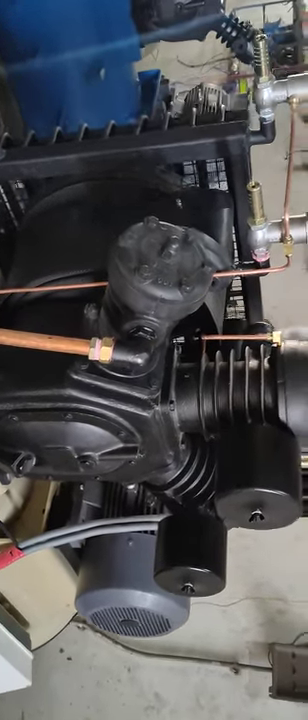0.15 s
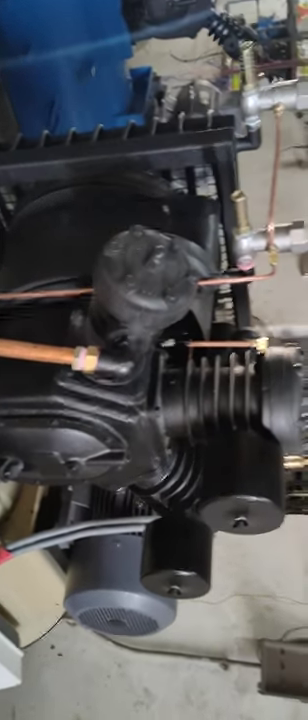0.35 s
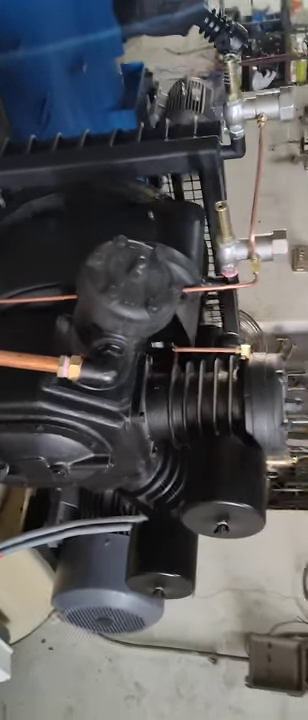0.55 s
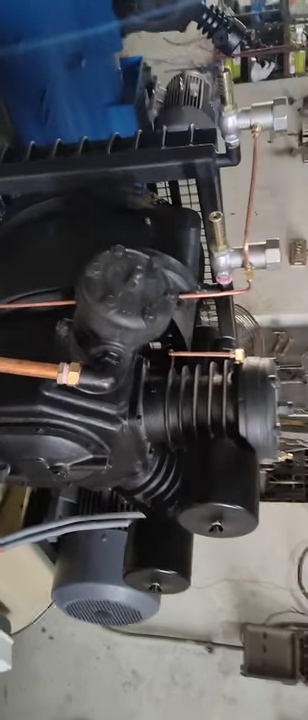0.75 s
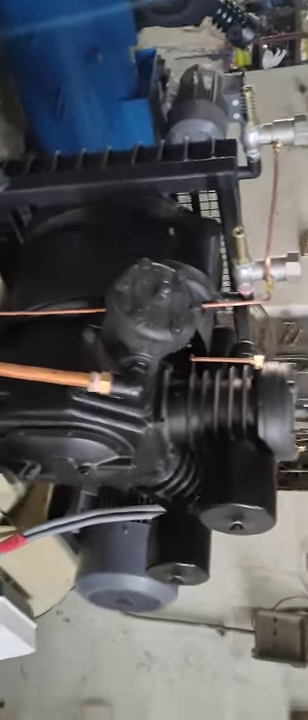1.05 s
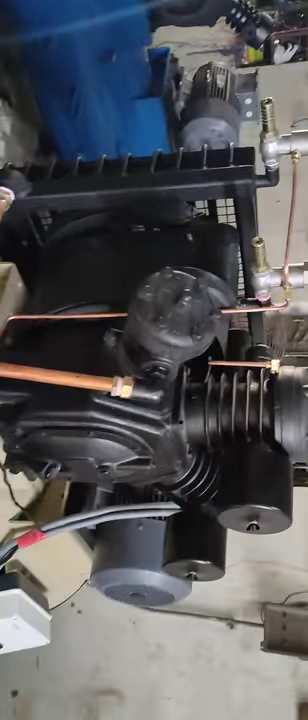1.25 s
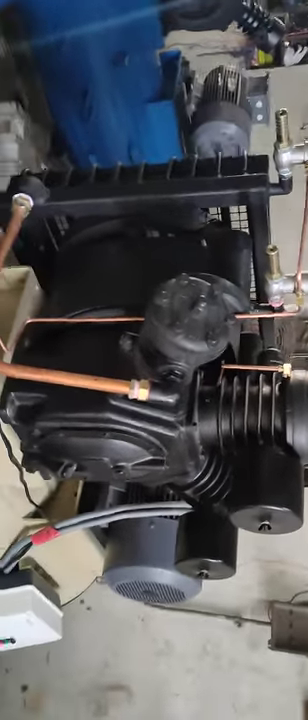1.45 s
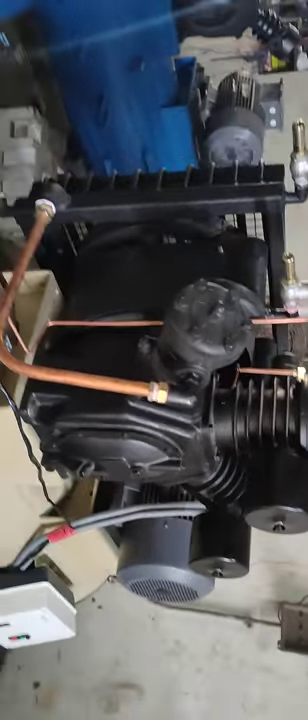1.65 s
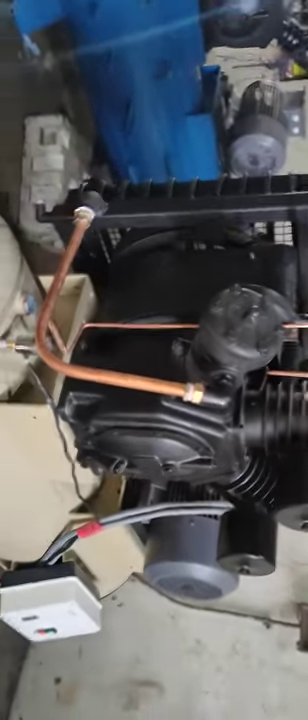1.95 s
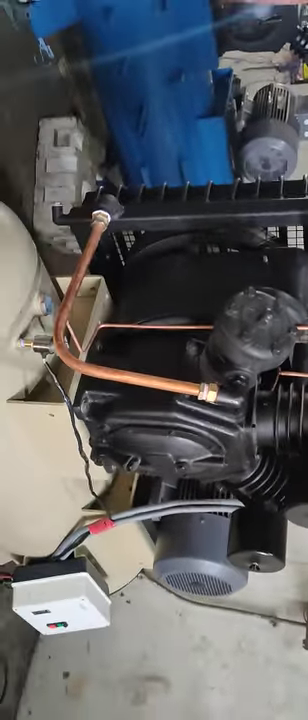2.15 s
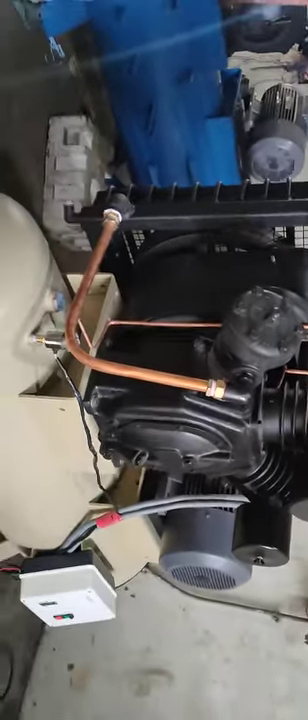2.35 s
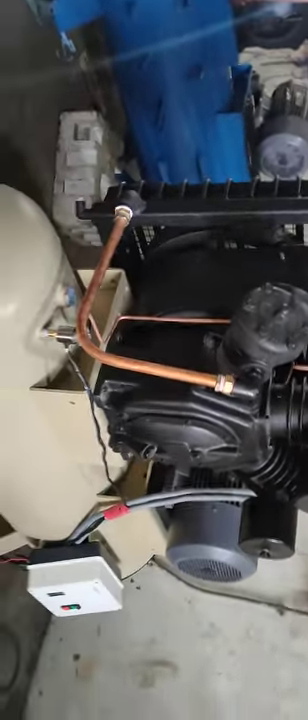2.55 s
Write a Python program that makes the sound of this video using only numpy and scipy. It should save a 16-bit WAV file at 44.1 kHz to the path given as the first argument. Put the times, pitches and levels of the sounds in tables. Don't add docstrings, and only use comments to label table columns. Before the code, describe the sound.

Steady motor-driven compressor with a buzzing, throbbing drone about fourteen turns a second, ticking valve plates and rushing air; later compressed air hisses through pipework. Close handheld phone microphone, stereo, slight room tail.

```python
import sys
import numpy as np
from scipy import signal
from scipy.fft import rfft, irfft, next_fast_len
from scipy.io import wavfile
from scipy.ndimage import uniform_filter1d, map_coordinates

SR = 44100
rng = np.random.default_rng(int(sys.argv[2]) if len(sys.argv) > 2 else 0)


def generate_wav(sig):
    pcm = np.round(np.clip(np.atleast_2d(sig).T, -1, 1) * 32767).astype(np.int16)
    wavfile.write(sys.argv[1], SR, pcm)


def natural_amplitude(level_db):
    exponent = np.asarray(level_db, float) / 20
    return 10 ** exponent


N = 119070

SHAFT_HZ = 14.06
FLOOR_HZ = 500


def unit(x):
    return x / np.sqrt(np.mean(x ** 2) + 1e-20)


def along(points, hz):
    f, v = np.transpose(points)
    return np.interp(np.log(hz + 1), np.log(f + 1), v)


def curve(rows, column=1):
    rows = np.transpose(rows)
    return np.interp(np.arange(N) / SR, rows[0], rows[column])


def wobble(rate):
    return map_coordinates(rng.standard_normal(400), [np.arange(N) * rate / SR])


def filtered(x, response):
    m = next_fast_len(N + SR // 4)
    return irfft(rfft(x, m) * response(np.fft.rfftfreq(m, 1 / SR)), m)[..., :N]


def peaks(rows, hz, lift_db=0):
    power = sum(natural_amplitude(db + lift_db) ** 2 / (1 + (2 * (hz - c) / w) ** 2) for c, w, db in rows)
    return np.sqrt(1 + power)


def pair(a, b, alike):
    turn = np.arccos(np.clip(alike, -1, 1)) / 2
    middle, side = a * np.cos(turn), b * np.sin(turn)
    return np.array([middle + side, middle - side])


# frequency in Hz, likeness from -1 to 1.
NOISE_ALIKE = [(60, 0.99), (130, 0.97), (290, 0.83), (640, 0.78), (1410, 0.1), (3100, -0.02), (6820, 0.036),
               (15000, -0.13)]


def rush(colour, patchy_db):
    hz, _, z = signal.stft(rng.standard_normal((2, N)), SR, nperseg=1024, noverlap=768)
    patches = uniform_filter1d(rng.standard_normal(z.shape[1:]), 9, 0)
    patches = uniform_filter1d(patches, 12, 1)
    z = pair(*z, along(NOISE_ALIKE, hz)[:, None]) * natural_amplitude(patchy_db * unit(patches))
    noise = signal.istft(z, nperseg=1024, noverlap=768)[1][:, :N]
    return unit(filtered(noise, colour))


# order, level in dB by the cylinders, at the second place, at the third, by the tank.
STRONG_ORDERS = [(19, -51, -48, -47, -54), (22, -39, -38, -39, -40), (23, -33, -31, -31, -35),
                 (24, -42, -41, -41, -47), (25, -33, -35, -57, -47), (26, -41, -42, -44, -49),
                 (27, -48, -47, -50, -48), (28, -41, -39, -40, -49), (29, -36, -40, -37, -33),
                 (30, -51, -43, -42, -47), (31, -40, -50, -43, -39), (32, -38, -41, -49, -44),
                 (33, -44, -53, -46, -45), (35, -47, -52, -58, -61), (37, -48, -50, -64, -52),
                 (42, -41, -44, -47, -49), (43, -40, -40, -46, -47), (47, -50, -56, -47, -58),
                 (49, -41, -49, -50, -46), (50, -45, -46, -37, -57), (51, -51, -44, -40, -43),
                 (52, -48, -60, -54, -56), (53, -48, -42, -47, -59), (54, -45, -47, -47, -47),
                 (55, -45, -41, -49, -58), (56, -45, -58, -42, -44), (57, -48, -54, -55, -70),
                 (61, -43, -48, -54, -50), (62, -47, -54, -51, -52), (64, -51, -54, -62, -60),
                 (65, -50, -58, -53, -66), (68, -49, -54, -51, -52), (70, -46, -51, -47, -49),
                 (71, -46, -52, -73, -59), (77, -68, -46, -49, -51), (83, -59, -49, -54, -52),
                 (84, -44, -51, -69, -56), (85, -54, -49, -42, -57), (87, -50, -57, -55, -58),
                 (113, -64, -56, -63, -49)]
# order, level in dB by the cylinders, level in dB by the tank.
LOW_ORDERS = [(4, -77, -85), (5, -71, -75), (6, -72, -75), (7, -77, -74), (8, -73, -82), (9, -65, -70),
              (10, -71, -72), (11, -68, -72), (12, -60, -68), (13, -62, -66), (14, -76, -78),
              (15, -75, -72), (16, -66, -68), (17, -68, -72), (18, -63, -62)]
PLACES_S = [.3, .95, 1.6, 2.35]
STROKES_NEAR = [(0.1889, 0.62), (0.2107, 0.48), (0.4352, 0.06), (0.5834, 0.33), (0.7499, 0.42),
                (0.8529, 0.33), (0.9535, 0.42)]
STROKES_MID = [(0.1915, 0.55), (0.2145, 0.49), (0.5833, 0.33), (0.7506, 0.57), (0.8546, 0.48),
               (0.9535, 0.47), (0.9624, 0.25)]
STROKES_PAST = [(0.2163, 0.51), (0.5342, 0.49), (0.584, 0.2), (0.7511, 0.67), (0.7795, 0.45),
                (0.9621, 0.36), (0.965, 0.57)]
STROKES_FAR = [(0.0421, 0.44), (0.2286, 0.68), (0.2516, 0.58), (0.5493, 0.53), (0.6013, 0.32), (0.752, 0.6),
               (0.9654, 0.67)]
# frequency in Hz, likeness.
TURN_ALIKE = [(200, .98), (330, .87), (500, .75), (800, .5), (1000, .2), (1500, 0)]
UNEVEN_DB, UNEVEN_TURN, UNEVEN_S = .5, .06, .12


def thud():
    rows = STRONG_ORDERS + [(k, near, near, (near + far) / 2, far) for k, near, far in LOW_ORDERS]
    order, *order_db = np.transpose(rows)
    strokes = [STROKES_NEAR, STROKES_MID, STROKES_PAST, STROKES_FAR]
    pulses = [sum(g * np.exp(-2j * np.pi * order * s) for s, g in place) for place in strokes]
    timing = np.unwrap(np.angle(pulses), axis=0)
    side = np.tan(np.arccos(along(TURN_ALIKE, order * SHAFT_HZ)) / 2)
    side = side * np.sign(rng.standard_normal(len(order)))
    t = np.arange(N) / SR
    knots = np.arange(0, N / SR + UNEVEN_S, UNEVEN_S)
    out = np.zeros((2, N))
    for k, level_db, lag, s in zip(order, np.transpose(order_db), timing.T, side):
        swell, slip = rng.standard_normal((2, len(knots)))
        level = np.interp(knots, PLACES_S, natural_amplitude(level_db)) * natural_amplitude(UNEVEN_DB * swell)
        angle = np.interp(t, knots, np.interp(knots, PLACES_S, lag) + UNEVEN_TURN * slip)
        tone = np.interp(t, knots, level) * np.exp(1j * (2 * np.pi * k * SHAFT_HZ * t + angle))
        out += [tone.real - s * tone.imag, tone.real + s * tone.imag]
    return np.sqrt(2) * out


# time in seconds, place from 0 (cylinders) to 1 (tank).
WALK = [
    (.5, 0),
    (1.35, .5),
    (2.2, 1),
]
# frequency in Hz, level in dB each.
WEAK_ORDERS = [(30, -82), (265, -54), (600, -53), (1200, -54), (1600, -57), (1800, -64), (2500, -62),
               (3400, -64)]
# frequency in Hz, change in dB.
WEAK_FAR = [(100, -5), (200, 6), (300, -12), (900, -4.5), (3000, -4)]
DRIFT = .1


def crank():
    size, places = 2048, 9
    k = np.arange(size // 2 + 1)
    hz = k * SHAFT_HZ
    loose = np.exp(2j * np.pi * rng.random(len(k)))
    side = 1j * np.sign(rng.standard_normal(len(k)))
    played_by_thud = np.isin(k, [r[0] for r in STRONG_ORDERS + LOW_ORDERS])
    near, far = np.sqrt(rng.exponential(size=(2, len(k)))) * (k > 0) * (k < 245) * ~played_by_thud
    phase = np.arange(N) * SHAFT_HZ / SR % 1 * size
    place = np.linspace(0, places - 1, N)
    way = np.clip(curve(WALK), 0, 1)
    out = np.zeros((2, N))
    for p in range(places):
        w = way[min(N - 1, p * N // (places - 1))]
        level = natural_amplitude(along(WEAK_ORDERS, hz) + w * along(WEAK_FAR, hz)) * (near + w * (far - near))
        loose = loose * np.exp(2j * DRIFT * rng.standard_normal(len(k)))
        spectrum = pair(loose, loose * side, along(TURN_ALIKE, hz)) * level
        turn = irfft(spectrum, size) * size / np.sqrt(2)
        fade = np.clip(1 - abs(place - p), 0, 1)
        out += fade * [np.interp(phase, np.arange(size + 1), np.append(c, c[0])) for c in turn]
    return out


# share of the turn, level in dB, left-right lean
# in dB, extra dB in the seat's ring.
VALVES = [
    (.505, -26.5, 4, -6),
    (.692, -27.5, -6.5, -2.5),
    (0.8, -30, 6, 3),
    (.87, -36, -3, -2),
    (0.049, -33.5, 2, 6),
]
# frequency in Hz, level in dB per Hz.
PLATE = [(1500, 4), (2500, 4.5), (3500, 3.5), (4500, -10.5), (7700, -3.5), (10500, -3.5), (13000, 0),
         (15700, -0.5)]
# centre in Hz, width in Hz, height in dB.
PLATE_RING = [(5290, 480, 10.5), (6700, 380, 2), (7095, 200, 6.5)]
# frequency in Hz, level in dB, t60 in seconds, index of the valve.
PING = [(12750, -41, .03, 1), (13500, -36, .04, 1), (6900, -38, .05, 1), (5350, -44, .025, 1),
        (12200, -42, .03, 0)]
PING_LEAN_DB = [-25, -18, 0, 6, -13]
SEAT_HZ = [5830, 7460]
SEAT_FAR_DB = -0.5
TICK_SCATTER_DB, TICK_JITTER_S, PING_SCATTER = .7, .0002, .003
SLAP_S, TAIL_DB, TAIL_S = .045, -9, .25


def valves():
    lead = SR // 4
    env = np.zeros((2, 2, N + SR))
    ping = np.zeros((2, N + SR))
    t = np.arange(SR // 4) / SR
    ping_t = t[:2000]
    tail = natural_amplitude(2 * TAIL_DB - 120 * t / TAIL_S)
    slap = natural_amplitude(-120 * t / SLAP_S)
    for v, (share, db, lean_db, seat_db) in enumerate(VALVES):
        shape = np.array([[slap + tail], [natural_amplitude(2 * seat_db) * slap + natural_amplitude(seat_db) * tail]])
        modes = [p for p in zip(PING, PING_LEAN_DB) if p[0][3] == v]
        for n, (late, loud) in enumerate(rng.standard_normal((42, 2)), -3):
            i = round(((n + share) / SHAFT_HZ + TICK_JITTER_S * late) * SR) + lead
            tick_db = 2 * (db + TICK_SCATTER_DB * loud) + np.array([[lean_db], [-lean_db]])
            env[..., i:i + len(t)] += natural_amplitude(tick_db) * shape
            for (hz, ring_db, ring_s, _), side_db in modes:
                c = rng.standard_normal(4)
                tone = np.sin(2 * np.pi * (hz * (1 + PING_SCATTER * c[0]) * ping_t + c[1:3, None]))
                sides_db = np.array([[side_db], [-side_db]]) / 2
                ping[:, i:i + 2000] += natural_amplitude(ring_db + c[3] - 60 * ping_t / ring_s + sides_db) * tone
    rattle = rush(lambda f: (f > FLOOR_HZ) * natural_amplitude(along(PLATE, f)) * peaks(PLATE_RING, f), .5)
    seat = filtered(rattle, lambda f: (f > SEAT_HZ[0]) * (f < SEAT_HZ[1]))
    wide, narrow = np.sqrt(env[..., lead:lead + N])
    slaps = wide * (rattle - seat) + natural_amplitude(SEAT_FAR_DB * curve(WALK)) * narrow * seat
    return filtered(slaps + ping[:, lead:lead + N], lambda f: f > FLOOR_HZ)


# time in seconds, flow in dB, top of the jet in dB, low pipe tone in dB.
BLEED = [(0, -71, 2, -2), (1.28, -68, -4, 8), (1.33, -43, -2, 2), (1.4, -31.5, 4, 2.5), (1.54, -27, 3, 0.5),
         (1.7, -25.5, 2, 0.5), (1.82, -25.5, 2, -2.5), (2, -26, -3, 0), (2.1, -25, -3, 1.5),
         (2.2, -26, -7, 2), (2.3, -26, -9, -0.5), (2.42, -22, -3, -3), (2.55, -25, -3, 0.5),
         (2.62, -26, 0, 4.5), (2.7, -26.5, -1, 1)]
# frequency in Hz, level in dB per Hz.
JET = [(600, -50), (1800, -7), (3000, 2.5), (4000, -2), (4400, -4), (5200, -6.5), (9000, -10), (15700, -2)]
# centre in Hz, width in Hz, height in dB.
PIPE = [(2985, 114, -0.5), (3550, 620, -2), (7440, 110, -6), (8235, 340, 8.5), (9700, 510, 4.5),
        (11130, 190, 9), (12760, 240, 1), (14700, 430, 4)]
# their pitches in Hz, then their heights in dB.
WHISTLE_HZ = [2748, 3045, 3663, 3828, 6104, 6615, 6765, 6887, 7030, 8086]
WHISTLE_DB = [9, 7, 6, 4, 8, 4, 4, 5, 5, 4]
WHISTLE_WIDTH_HZ, PIPE_DB = 25, 6
LOW_HZ, HIGH_HZ = 4040, 14000


def bleed():
    flow_db = curve(BLEED) + .5 * wobble(14.9) + 0.6 * wobble(70)
    whistles = [(hz, WHISTLE_WIDTH_HZ, db) for hz, db in zip(WHISTLE_HZ, WHISTLE_DB)]

    def colour(f):
        return (f > FLOOR_HZ) * natural_amplitude(along(JET, f)) * peaks(PIPE, f, PIPE_DB) * peaks(whistles, f)

    jet = rush(colour, 1.1)
    low = filtered(jet, lambda f: 1 / (1 + (f / LOW_HZ) ** 8))
    high = filtered(jet, lambda f: 1 - 1 / (1 + (f / HIGH_HZ) ** 8))
    top_gain, low_gain = natural_amplitude(curve(BLEED, column=2)), natural_amplitude(curve(BLEED, column=3))
    return natural_amplitude(flow_db) * (jet + (top_gain - 1) * high + (low_gain - 1) * low)


# frequency in Hz, level in dB per Hz.
FAN = [(30, -48), (200, -56), (300, -1), (700, -5), (1500, -6.5), (3500, -13.5), (4500, -19),
       (15700, -23.5)]
# centre in Hz, width in Hz, height in dB.
CASING = [(302, 140, -2), (770, 90, 0), (1193, 10, 3), (1584, 85, 5.5), (2304, 26, 6), (2640, 85, 10),
          (3505, 130, 5)]
FAN_DB = -29.5


def fan():
    air = rush(lambda f: natural_amplitude(along(FAN, f)) * peaks(CASING, f), 1)
    return natural_amplitude(FAN_DB + 0.34 * wobble(2.95)) * air


def scene():
    return thud() + crank() + valves() + bleed() + fan()


def roll_off(x):
    return signal.sosfilt(signal.butter(12, 16780, fs=SR, output="sos"), x)


# centre in Hz, width in Hz, height in dB.
PORT = [(6790, 730, 16)]
# frequency in Hz, left-right difference in dB.
LEAN = [(200, -1), (700, 0), (2400, 1.5), (7000, 1), (10000, -1.5), (15000, -4)]
TOP_HZ = 15750


def record(dry):
    mix = filtered(dry, lambda f: peaks(PORT, f) * (f < TOP_HZ) * natural_amplitude(along(LEAN, f) * [[.5], [-.5]]))
    return roll_off(mix)


dry = scene()
out = record(dry)
generate_wav(out)
```